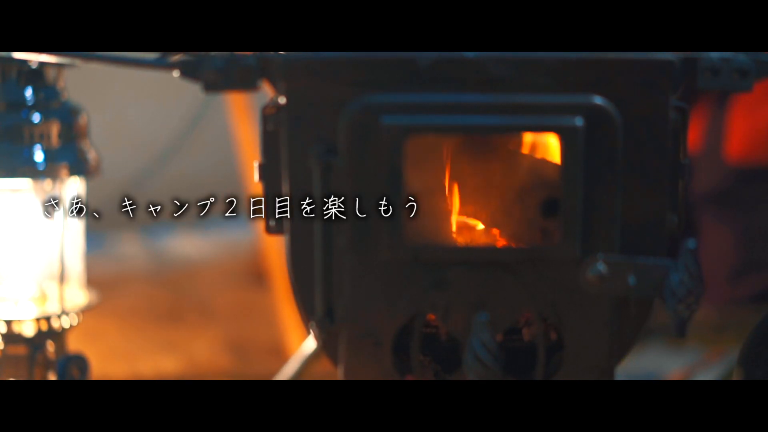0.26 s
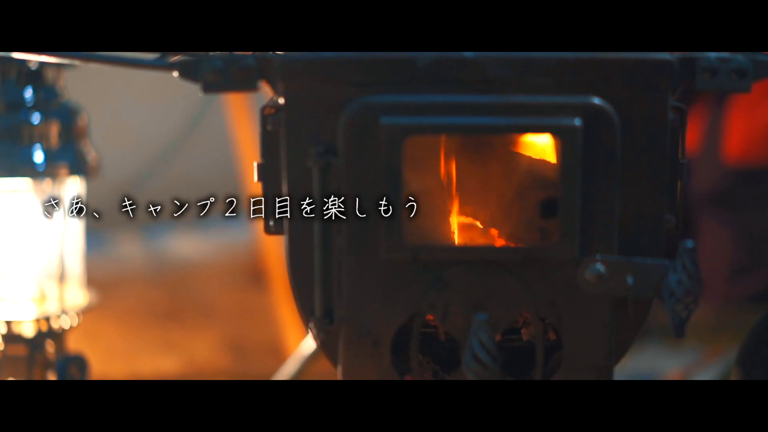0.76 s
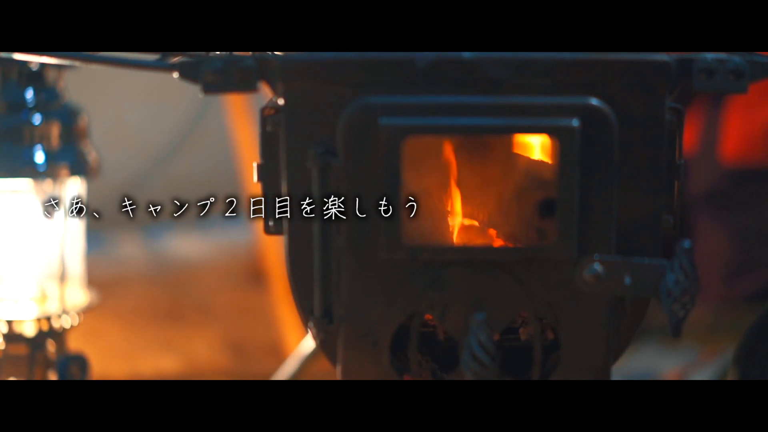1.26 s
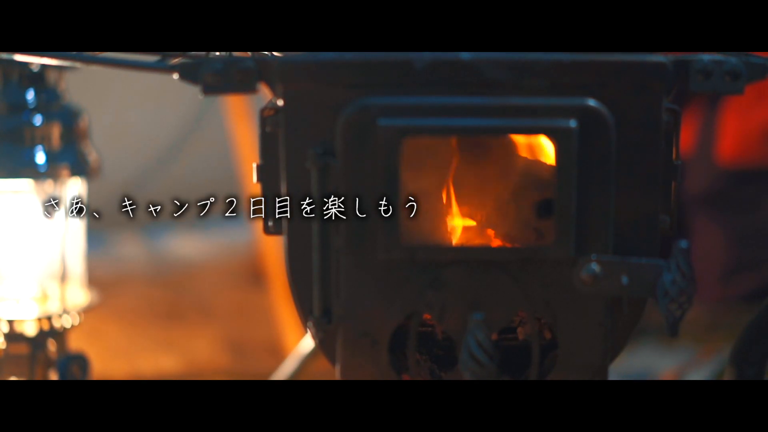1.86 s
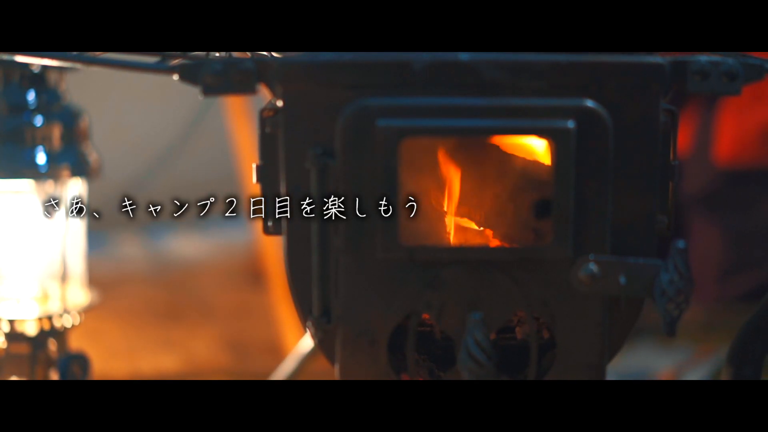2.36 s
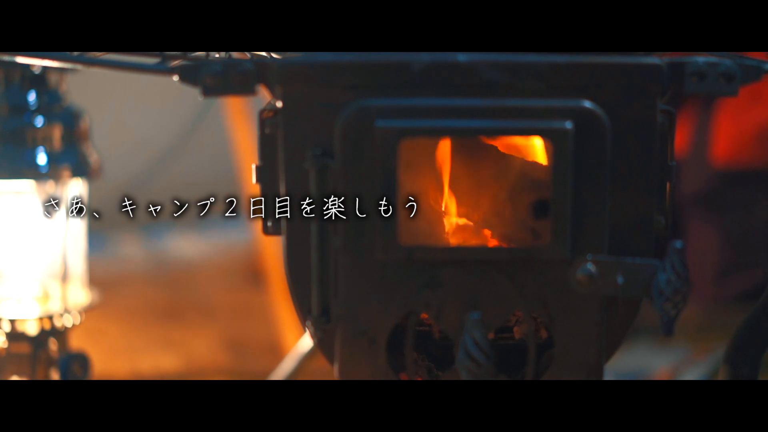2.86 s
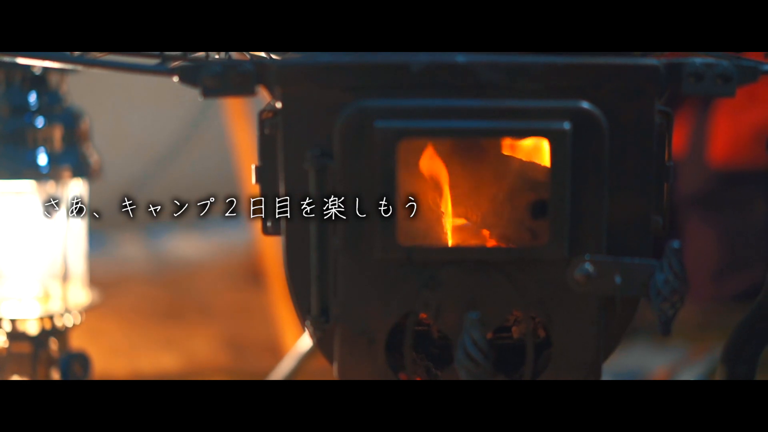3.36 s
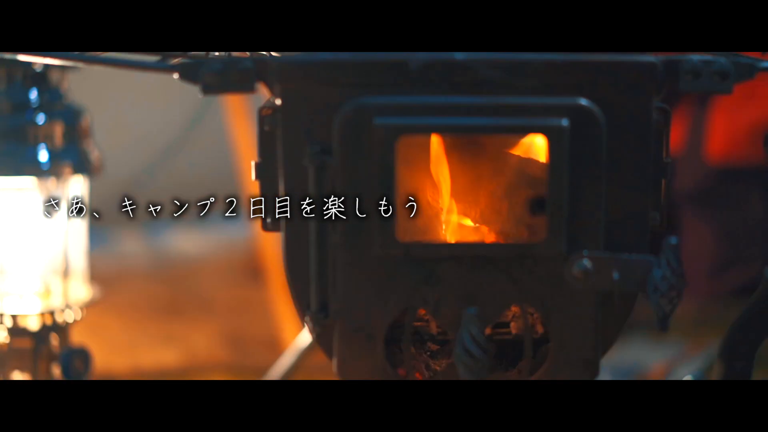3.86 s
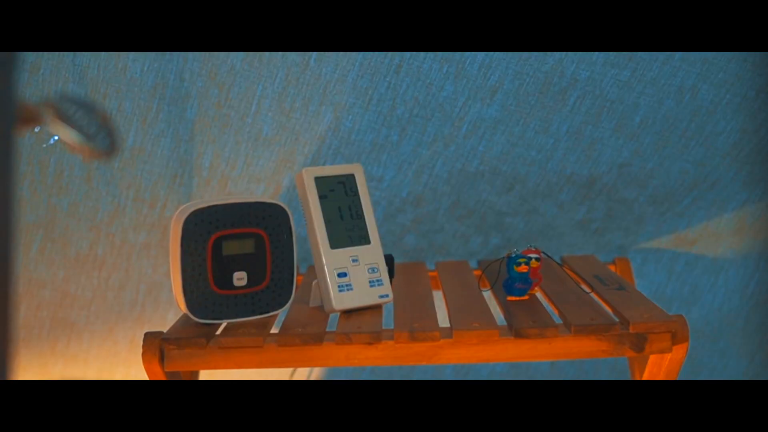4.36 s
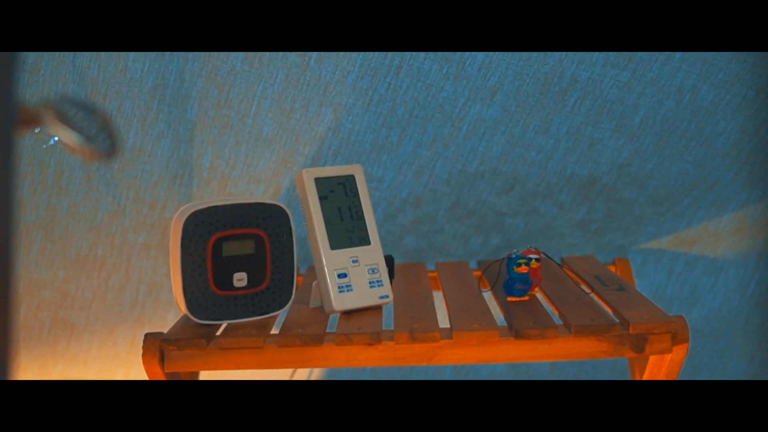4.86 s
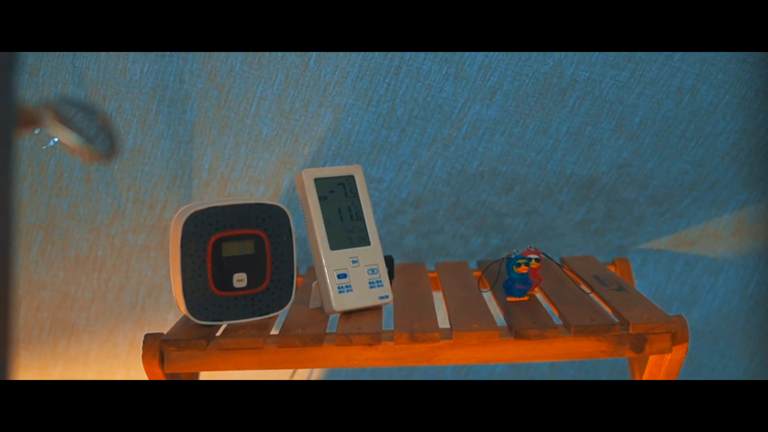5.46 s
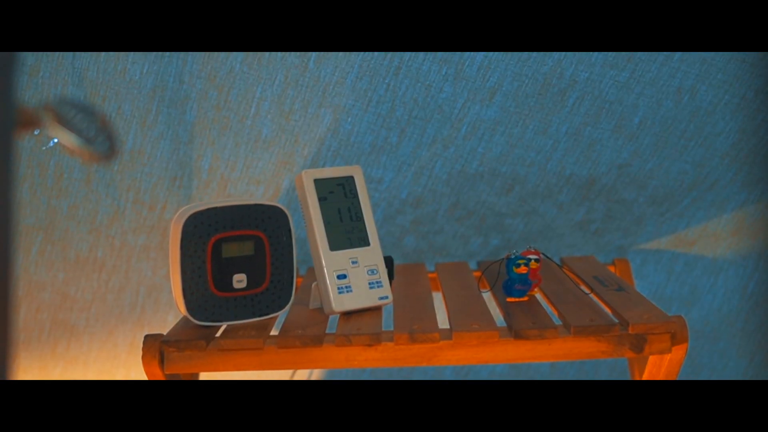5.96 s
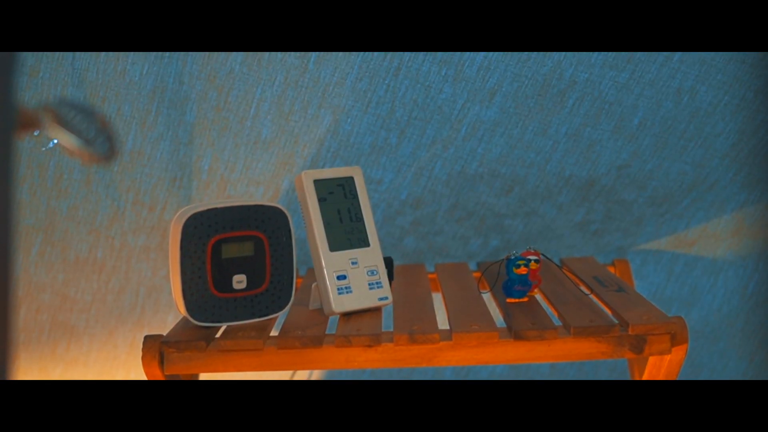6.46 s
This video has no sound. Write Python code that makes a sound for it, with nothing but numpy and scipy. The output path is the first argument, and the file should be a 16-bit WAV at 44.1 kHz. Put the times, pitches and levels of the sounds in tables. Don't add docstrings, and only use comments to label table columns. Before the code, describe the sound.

Distant hand grinding of coffee beans in a small fabric shelter, stereo and fairly quiet, with occasional dry snaps and faint piercing crank squeaks about once a turn. A bird whistles one brief descending note outside to the right. Then the view of the sound shifts quickly to close, central mono: a hollow rattling body, gritty hiss, burr ring and constant bean crunching, its fine grit becoming patchy as the hopper runs low.

```python
import sys
import numpy as np
from scipy import signal
from scipy.fft import rfft, irfft, next_fast_len
from scipy.io import wavfile

SR = 44100
rng = np.random.default_rng(int(sys.argv[2]) if len(sys.argv) > 2 else 0)


def transcribe(signal):
    frames = np.atleast_2d(signal).T
    limited = np.clip(frames, -1, 1)
    pcm = np.round(limited * 32767).astype(np.int16)
    wavfile.write(sys.argv[1], SR, pcm)


def how_loud(loudness_db):
    steps = np.asarray(loudness_db, float) / 20
    return 10 ** steps


N = 295911
SIZE = 4096


def in_time(rows):
    s, *columns = np.transpose(rows)
    return [np.interp(np.arange(N) / SR, s, c) for c in columns]


def rms_one(x):
    return x / np.sqrt(np.mean(x ** 2) + 1e-20)


def drift(rate_hz):
    knots = rng.standard_normal(4000)
    return np.interp(np.arange(N) / SR * rate_hz, np.arange(len(knots)), knots) * np.sqrt(3 / 2)


def swell(t, peak_db, rise_db_per_s, fall_db_per_s):
    return peak_db - np.where(t < 0, -rise_db_per_s * t, fall_db_per_s * t)


def through(x, impulse):
    return signal.oaconvolve(x, impulse)[:N]


def split(x, *edges_hz):
    length = next_fast_len(N)
    hz = np.fft.rfftfreq(length, 1 / SR)
    below = [0] + [1 / (1 + (hz / edge) ** 10) for edge in edges_hz] + [1]
    spectrum = rfft(x, length)
    return [irfft(spectrum * (b - a), length)[..., :N] for a, b in zip(below, below[1:])]


def response(colour, body, *more):
    hz = np.maximum(np.fft.rfftfreq(SIZE, 1 / SR), 10)
    db = 0
    for curve in (colour, *more):
        curve_hz, curve_db = np.transpose(curve)
        db = db + np.interp(np.log(hz), np.log(curve_hz), curve_db)
    for centre_hz, width_hz, lift_db in body:
        db = db + lift_db / (1 + (2 * (hz - centre_hz) / width_hz) ** 2)
    cepstrum = irfft(np.log(how_loud(np.maximum(db, -90))))
    cepstrum[1:SIZE // 2] *= 2
    cepstrum[SIZE // 2 + 1:] = 0
    return irfft(np.exp(rfft(cepstrum)))


# (time [s], pitch [Hz], level [dB])
CHIRP = [
    (1.302, 7000, -62),
    (1.307, 7040, -12),
    (1.315, 7150, -15),
    (1.321, 7390, -22),
    (1.330, 7220, -24),
    (1.335, 7110, -11),
    (1.343, 6760, -17),
    (1.358, 6720, -22),
    (1.395, 6660, -52),
]
LAG_RAD, LAG_RAD_PER_S, LAG_LEAST_RAD = 3.1, -38, 1.1
RASP_S, RASP_DB, RASP_RISE_DB_PER_S, RASP_FALL_DB_PER_S = 1.322, -34.5, 530, 550


def bird():
    (hz, db), t = in_time(CHIRP), np.arange(N) / SR
    start_s, end_s = CHIRP[0][0], CHIRP[-1][0]
    lag = np.maximum(LAG_RAD + LAG_RAD_PER_S * (t - start_s), LAG_LEAST_RAD)
    phase = 2 * np.pi * np.cumsum(hz) / SR - lag * [[1], [0]]
    turning = np.clip((t - 1.312) / .015, 0, 1)
    hoarse = how_loud(-6.5) * turning * (drift(450) * np.cos(phase) + drift(450) * np.sin(phase))
    tone = (np.sin(phase) + hoarse) * how_loud(db) * how_loud([[-2.5], [1.0]])
    band = signal.butter(2, [5200, 8200], "band", fs=SR, output="sos")
    rasp_db = swell(t - RASP_S, RASP_DB, RASP_RISE_DB_PER_S, RASP_FALL_DB_PER_S)
    breath = rms_one(signal.sosfilt(band, rng.standard_normal(N))) * how_loud(rasp_db)
    calling = (t > start_s) & (t < end_s)
    whistle = (tone + breath) * calling
    out = whistle.copy()
    for delay_s, echo_db in [(.0062, -8.5), (.018, -20), (.033, -22)]:
        out += how_loud(echo_db) * np.roll(whistle, round(delay_s * SR), axis=1)
    return out


# (loudest moment [s], level [dB], pitch [Hz], left minus right [dB])
SQUEAKS = [(.04, -47, 14800, 5), (.11, -52, 14800, 5), (.248, -48, 14750, 5), (.347, -39, 14806, 8),
           (.808, -40, 14790, 3.5), (.9, -45, 14800, 5), (1.207, -39, 14730, 12), (2.167, -27, 14770, 7),
           (2.604, -34, 14710, 7), (3.041, -32, 14760, 10.5), (3.492, -29.5, 14740, 8),
           (3.965, -38, 14790, 9.5), (4.741, -23, 14800, -0.5), (6.028, -19, 14600, 0),
           (6.126, -33, 14850, -0.5), (6.54, -50, 14880, 0)]
SQUEAK_RISE_S, SQUEAK_FALL_S, SQUEAK_FLOOR_DB = .028, .048, -60
SQUEAK_FLAT_DB = 3.5
SQUEAK_FULL_DB = 32


def squeaks(width_hz=95):
    out, span = np.zeros((2, N)), np.arange(-SIZE, SIZE)
    for s, peak_db, hz, pan_db in SQUEAKS:
        slips = rng.standard_normal((2, 2, len(span)))
        slips[1] = .8 * slips[0] + .6 * slips[1] if pan_db else slips[0]
        slow = signal.lfilter(*signal.butter(4, width_hz, fs=SR), slips)
        phase = 2 * np.pi * hz * span / SR
        tone = rms_one(slow[:, 0] * np.cos(phase) + slow[:, 1] * np.sin(phase))
        slope = np.sqrt(abs(peak_db - SQUEAK_FLOOR_DB) * SQUEAK_FULL_DB)
        db = swell(span / SR, peak_db, slope / SQUEAK_RISE_S, slope / SQUEAK_FALL_S)
        db = np.minimum(db, peak_db - SQUEAK_FLAT_DB)
        n = span + round(s * SR)
        heard = (db > SQUEAK_FLOOR_DB) & (n >= 0) & (n < N)
        out[:, n[heard]] += (tone * how_loud(db + [[pan_db / 2], [-pan_db / 2]]))[:, heard]
    return out


def grit(per_s, spread_db, smooth, throb_db):
    sizes = how_loud(spread_db * np.minimum(rng.exponential(1, N), 4)) * rng.standard_normal(N)
    clicks = rms_one(sizes * (rng.random(N) < per_s / SR))
    load = how_loud(throb_db * (drift(40) + drift(130)))
    share = np.clip(smooth, 0, 1)
    return rms_one(load * (np.sqrt(share) * rng.standard_normal(N) + np.sqrt(1 - share) * clicks))


def cracks(table, impulse, offset_db):
    out, t = np.zeros(N + 2 * SIZE), np.arange(SIZE // 2) / SR
    octaves = np.log2(np.maximum(np.fft.rfftfreq(2 * SIZE, 1 / SR), 50) / 5000)
    body = rfft(impulse, 2 * SIZE)
    body = body / np.sqrt(np.abs(body) + 1e-9)
    for s, peak_db, centre, width, crumble_s in table:
        decay = np.exp(-t / np.clip(crumble_s, .0005, .02))
        onset = 1 - np.exp(-t / crumble_s / 0.16)
        burst = rng.standard_normal(len(t)) * decay * onset
        band = np.exp(-((octaves - centre) / np.clip(width, .2, 3)) ** 2)
        sound = irfft(rfft(burst, 2 * SIZE) * body * band)[:SIZE]
        at = round(s * SR)
        out[at:at + SIZE] += how_loud(peak_db + offset_db) * sound / np.abs(sound).max()
    return out[:N]


def beans(table, kind, impulse):
    centre, width, crumble_s, offset_db = kind
    rows = [(s, db, centre + bright, width, crumble_s) for s, db, bright in table]
    return cracks(rows, impulse, offset_db)


FADE_START_S, FADE_LENGTH_S = 3.888, 0.39
FADE_OUT_POWER, FADE_IN_POWER = 1.34, 1.24


def faded():
    return np.clip((np.arange(N) / SR - FADE_START_S) / FADE_LENGTH_S, 0, 1)


# (frequency [Hz], density [dB per Hz])
FAR_COLOUR = [(24, -81), (40, -51.5), (179, -24.5), (378, -17), (623, -9.5), (820, -9.5), (977, -4.5),
              (1490, -11), (2230, 0.5), (2590, -9), (3580, -17), (8150, -18.5), (11300, -16.5),
              (15600, -21.5)]
# (frequency [Hz], width [Hz], lift [dB])
FAR_BODY = [(377, 36, -9.5), (616, 34, 3.5), (825, 29, -11), (1020, 340, 4), (1297, 53, 5),
            (1360, 130, 0.5), (1693, 55, 8), (1915, 34, 8), (2110, 38, -0.5), (2256, 137, 5),
            (3120, 31, 6.5), (4440, 190, 4.5), (7300, 1100, 3.5), (10400, 200, 5.5), (11300, 490, 3.5)]
# (frequency [Hz], side minus mid [dB])
FAR_WIDTH = [(60, -18), (110, -39), (200, -31), (380, -18), (700, -9), (1290, -4.5), (2380, -3.5),
             (4400, 2.5), (8120, -0.5), (15000, 2.5)]
# (frequency [Hz], left minus right [dB])
FAR_LEAN = [(60, -0.5), (110, 11), (200, -4.5), (380, 2.5), (700, -2), (1290, -1.0), (2380, -2.5),
            (4400, 1), (8120, -3), (15000, 4.5)]
# (time [s], peak level [dB], brightness over its kind [octaves])
FAR_CRACKS = [(0.1531, -24, .05), (0.5974, -24, .01), (1.8374, -25, .01), (1.8781, -28, .01),
              (2.1818, -20.5, .01), (2.2214, -28, .01), (2.719, -22.5, .1), (3.185, -26.5, -.05),
              (3.3288, -27.5, .01), (3.379, -22.5, .2), (3.6215, -28, .05)]
# (time [s], peak level [dB], brightness over its kind [octaves])
FAR_CRUNCHES = [(0.3446, -31, .01), (1.2057, -24, -.1), (1.312, -26.5, .01), (1.6094, -38, .01),
                (1.852, -20.5, .1), (1.9175, -21, -.7), (1.926, -29, -.8), (1.9394, -39, -.05),
                (2.734, -25, .01), (2.804, -30, .01), (3.7963, -28, .01), (3.8601, -32, .01),
                (3.9903, -24, .01)]
# (time [s], peak level [dB], brightness over its kind [octaves])
FAR_SNAPS = [
    (1.8781, -21, .01),
    (1.921, -34, -.9),
    (3.378, -11.5, .1),
]
# (centre [octaves above 5 kHz], width [octaves], crumble [s], offset [dB])
FAR_CRACK, FAR_CRUNCH, FAR_SNAP = (.5, 1.5, .005, -1.3), (-.5, 1.5, .013, -1.3), (.2, 2.9, .0015, -1.3)
FAR_BODY_DB, FAR_HISS_DB = -35, -45


def far_mill():
    mid_impulse = response(FAR_COLOUR, FAR_BODY)
    impulses = mid_impulse, response(FAR_COLOUR, FAR_BODY, FAR_WIDTH)
    body = split(np.array([through(grit(3000, 3.1, 0.86, 0.45), h) for h in impulses]), 4450)[0]
    hiss = split(np.array([through(grit(3000, 3.6, 0.98, 0.92), h) for h in impulses]), 3800)[1]
    mid, side = how_loud(FAR_BODY_DB) * body / np.std(body[0]) + how_loud(FAR_HISS_DB) * hiss / np.std(hiss[0])
    breaks = beans(FAR_CRACKS, FAR_CRACK, mid_impulse)
    breaks = breaks + beans(FAR_CRUNCHES, FAR_CRUNCH, mid_impulse)
    breaks = breaks + beans(FAR_SNAPS, FAR_SNAP, mid_impulse)
    left_lean, right_lean = [response([(hz, sign * db / 2) for hz, db in FAR_LEAN], []) for sign in (1, -1)]
    left = through(mid + side + breaks, left_lean)
    right = through(mid - side + breaks, right_lean)
    return np.array([left, right]) * (1 - faded()) ** FADE_OUT_POWER


# (frequency [Hz], density [dB per Hz])
NEAR_COLOUR = [(18, -65), (30, -33), (270, -6), (456, -10), (577, -4.5), (900, -6.5), (1000, -3),
               (1440, -8.5), (2500, -4), (4930, -16), (6930, -15.5), (9240, -23), (13300, -21),
               (14400, -25), (15600, -31)]
# (frequency [Hz], width [Hz], lift [dB])
NEAR_BODY = [(131.5, 32, 4.5), (486, 63, -1.5), (577, 170, 7.5), (646, 75, -5), (827, 190, 5.5),
             (4400, 520, 3), (988, 51, 8), (1272, 215, 6.5), (1555, 60, 5), (1697, 91, 6), (1876, 134, 4.5),
             (1990, 45, 10), (2439, 80, 6.5), (3720, 91, 2.5), (6880, 1360, 4.5), (10660, 220, -7),
             (11460, 570, 3), (12800, 350, 1)]
# (frequency [Hz], width [Hz], lift [dB])
BURR = [
    (9580, 420, 15.5),
    (10050, 480, 20.5),
    (10470, 400, 13),
    (10850, 300, -23),
]
# (time [s], level [dB])
EFFORT = [(4.1, -22.5), (4.35, -26.5), (4.48, -22), (4.65, -24.5), (5.0, -23), (5.16, -27.5), (5.33, -24),
          (5.51, -23.5), (5.71, -25), (5.82, -20.5), (5.9, -26), (6.18, -23), (6.3, -29), (6.52, -23.5),
          (6.71, -26.5)]
# (level over the load [dB], share of its swing [ratio], loss when low [dB per s],
# growing gaps when low [dB per s], clumps [dB])
LAYERS = [
    (0.53, 0.62, .1, 0.12, 0.21),
    (-14.5, 0.78, 0.38, 1.6, 1.36),
    (-14.5, 1.1, 2, 1.4, 2),
    (-23.5, .4, 6.4, 9, .9),
    (-25, .4, 9, 11, 1.2),
    (-19, .3, 1, 7, 0.87),
]
# (time [s], peak level [dB], brightness over its kind [octaves])
NEAR_CRACKS = [(4.1374, -13.5, .09), (4.209, -21, .08), (4.2738, -21, .01), (4.342, -17, -.03),
               (4.4489, -24, -.02), (4.497, -17, -.09), (4.5183, -14, .01), (4.6455, -19, .01),
               (4.734, -18, .01), (4.8111, -22, .01), (4.851, -17, .01), (5.0206, -18, -.2),
               (5.1188, -12, .03), (5.253, -17.5, .03), (5.323, -23, -.1), (5.43, -20.5, -.08),
               (5.496, -11.5, .09), (5.52, -14, .03), (5.616, -22.5, .01), (5.802, -23, -.15),
               (5.822, -20, -.04), (5.9385, -20, -.08), (6.042, -21, -.07), (6.07, -14, -.08),
               (6.185, -18, .01), (6.2259, -20.5, -.16), (6.311, -13, .08), (6.413, -17, -.05),
               (6.6604, -21, -.05), (6.6968, -17, .01)]
# (time [s], peak level [dB], brightness over its kind [octaves])
NEAR_CRUNCHES = [(4.586, -18, .01), (4.628, -17, .01), (4.742, -13.5, .01), (4.788, -26, .1),
                 (4.852, -24, .01), (4.873, -12, .01), (4.96, -21, -.04), (5.02, -12, .01),
                 (5.079, -13, .01), (5.256, -22, -.1), (5.292, -13, -.3), (5.328, -16, .1),
                 (5.453, -19, .01), (5.498, -14.5, .01), (5.522, -12, .01), (5.637, -22, .01),
                 (5.658, -13, .01), (5.694, -28, .01), (5.759, -22, -.1), (5.784, -24, .01),
                 (5.828, -12, -.1), (5.847, -14.5, .1), (6.179, -8.5, -.1), (6.189, -12, .1),
                 (6.252, -20, .1), (6.274, -17, -.15), (6.364, -14.5, .1), (6.463, -16, -.1),
                 (6.54, -23, -.05), (6.622, -12, -.1)]
# (centre [octaves above 5 kHz], width [octaves], crumble [s], offset [dB])
NEAR_CRACK, NEAR_CRUNCH = (.47, .33, .005, -5.5), (-1.3, 1.4, .008, -3)
RUNS_LOW_S = 5.67


def near_mill():
    load_db, = in_time(EFFORT)
    usual_db = np.mean(EFFORT, axis=0)[1]
    low_s = np.maximum(np.arange(N) / SR - RUNS_LOW_S, 0)
    impulse = response(NEAR_COLOUR, NEAR_BODY)
    parts = split(through(grit(2500, 3.8, 0.84, 0.69), impulse), 660, 1600, 2100, 3170)[:-1]
    body = sum(part * how_loud(1.1 * drift(25)) for part in parts)
    fine = through(grit(2000, 4.0, 0.66, 0.98), impulse)
    crunch, hiss, dust, powder = split(fine, 3230, 5060, 10700, 12800)[1:]
    burr = through(grit(3300, 3.7, .8, 0.2), response([(1000, -46), (16000, -29)], BURR))
    grinding = 0
    layers = body, crunch, hiss, dust, powder, burr
    for layer, (over_db, follows, loss_db, gap_db, clump_db) in zip(layers, LAYERS):
        db = usual_db + over_db + follows * (load_db - usual_db)
        db = db + low_s * (-gap_db * np.abs(drift(22)) - loss_db)
        db = db + clump_db * drift(18)
        grinding = grinding + how_loud(db) * rms_one(layer)
    breaks = beans(NEAR_CRACKS, NEAR_CRACK, impulse) + beans(NEAR_CRUNCHES, NEAR_CRUNCH, impulse)
    return grinding * faded() ** FADE_IN_POWER + breaks


def scene():
    return bird() + squeaks() + far_mill() + near_mill()


def masked(x, near_db=-11.5, up_db=-2, down_db=-5.5, chance_db=3, weak=.45):
    window = np.sin(np.pi * (np.arange(2048) + .5) / 2048)
    shape = dict(window=window, nperseg=2048)
    cells = signal.stft(x, **shape)[2]
    energy = np.abs(cells[:, :1024]) ** 2
    power = energy.mean(axis=0).reshape(64, 16, -1).sum(axis=1)
    level = 10 * np.log10(power + 1e-20)
    steps = np.arange(64)[:, None] - np.arange(14, 64)
    spread = near_db + np.where(steps > 0, up_db * steps, -down_db * steps)
    mask = (level[None, 14:] + spread[..., None]).max(axis=1)
    mask = mask + chance_db * rng.standard_normal(level.shape)
    keep = (level > mask) | (np.arange(64)[:, None] < 14)
    frames = keep.shape[1]
    stays = np.repeat(rng.random((2, frames // 2 + 1)) > [[.12], [.35]], 2, axis=1)
    keep[44:] &= stays[[0] + [1] * 19, :frames]
    usual = np.median(power, axis=1)[:, None]
    strong = energy > weak * np.repeat(np.minimum(power, 3 * usual), 16, axis=0) / 16
    strong[:, :160] = True
    cells[:, :1024] *= np.repeat(keep, 16, axis=0) * strong
    cells[:, round(15770 / SR * 2048):] = 0
    return signal.istft(cells, **shape)[1][:, :N]


def top_cut(x):
    return signal.sosfilt(signal.butter(12, 16650, fs=SR, output="sos"), x)


def record(dry):
    mix = masked(dry)
    return top_cut(mix)


dry = scene()
out = record(dry)
transcribe(out)
```